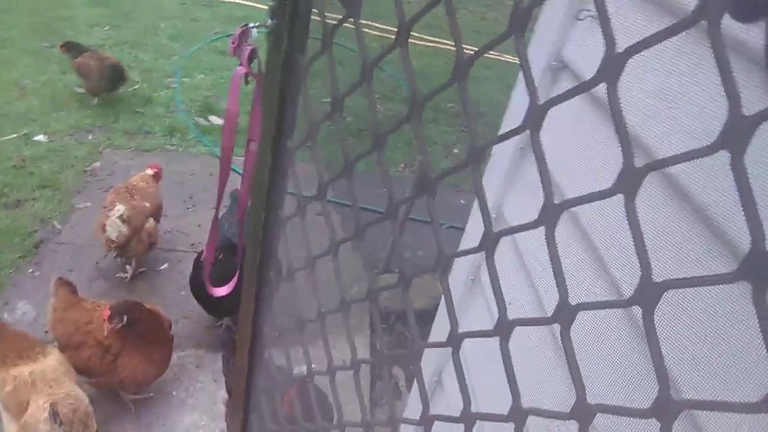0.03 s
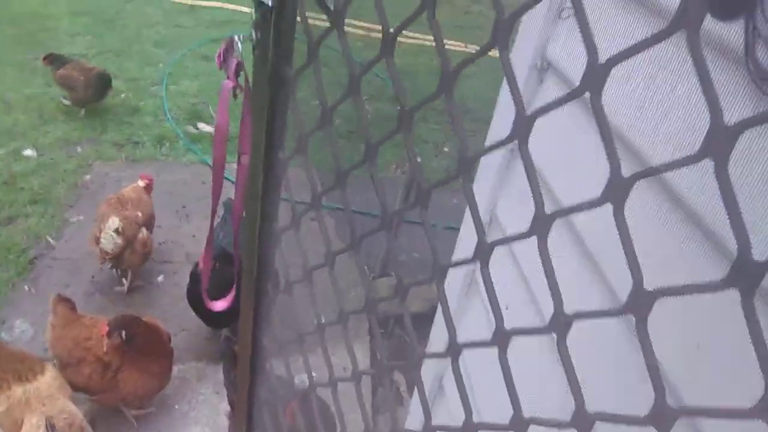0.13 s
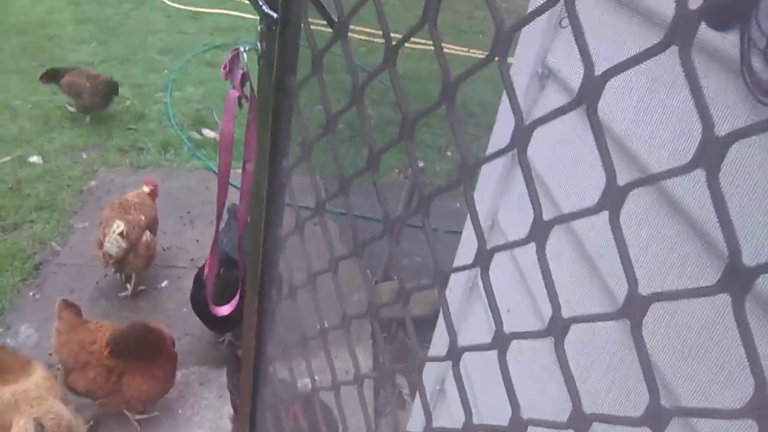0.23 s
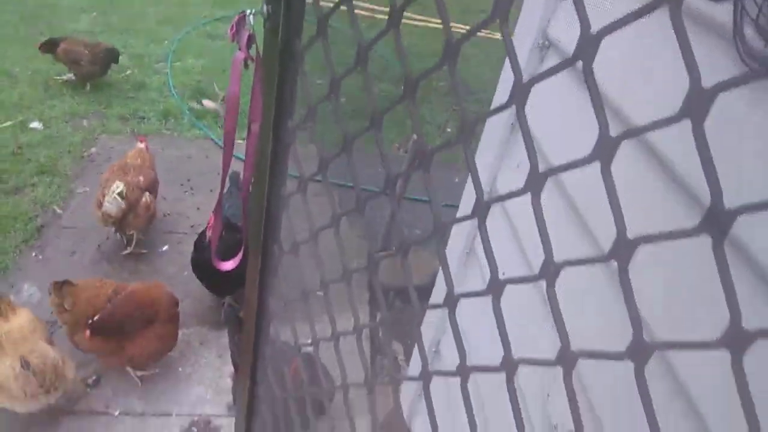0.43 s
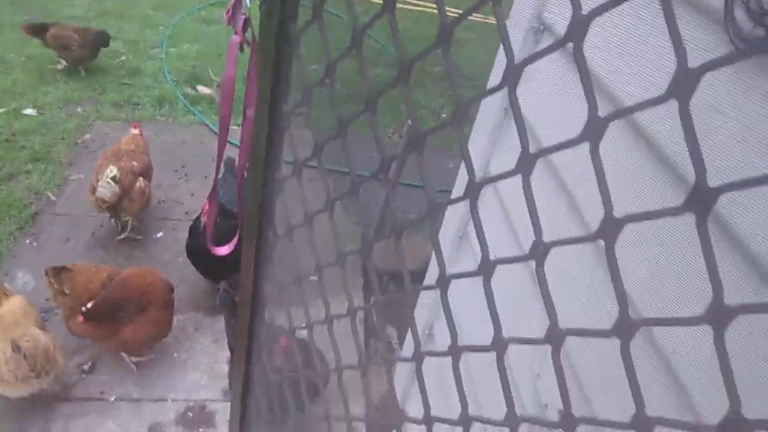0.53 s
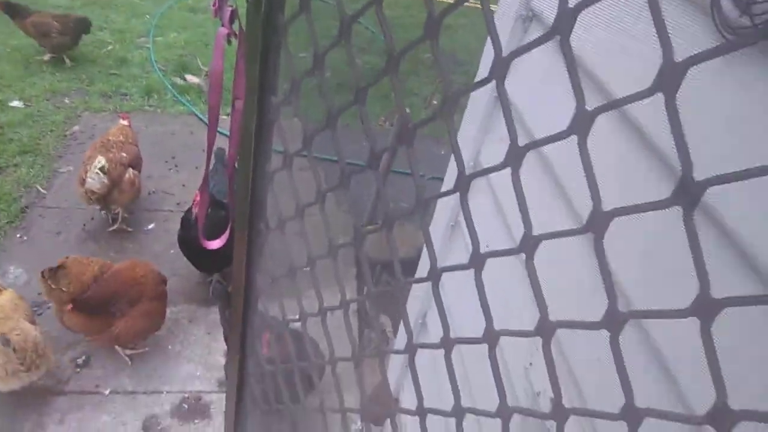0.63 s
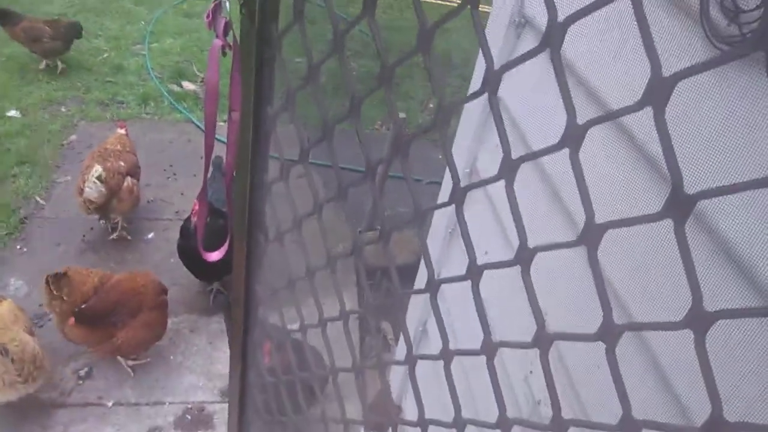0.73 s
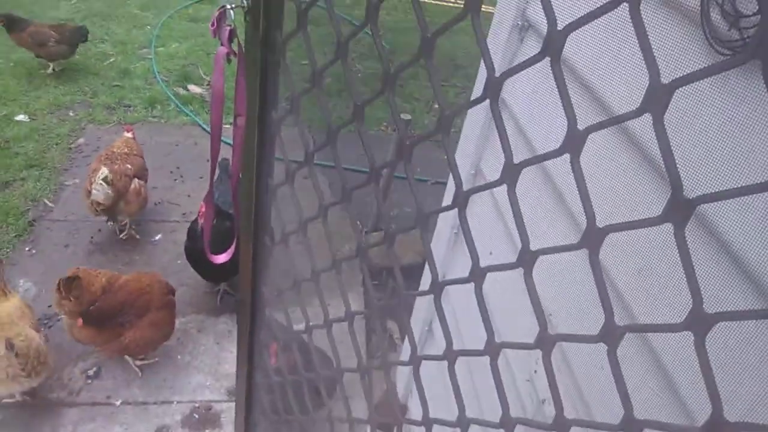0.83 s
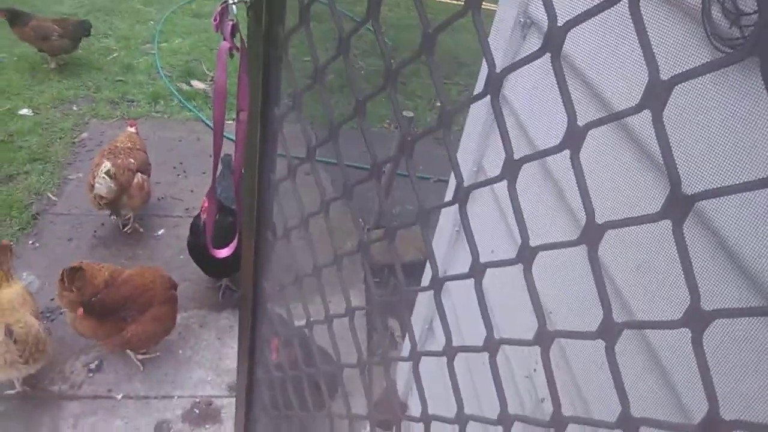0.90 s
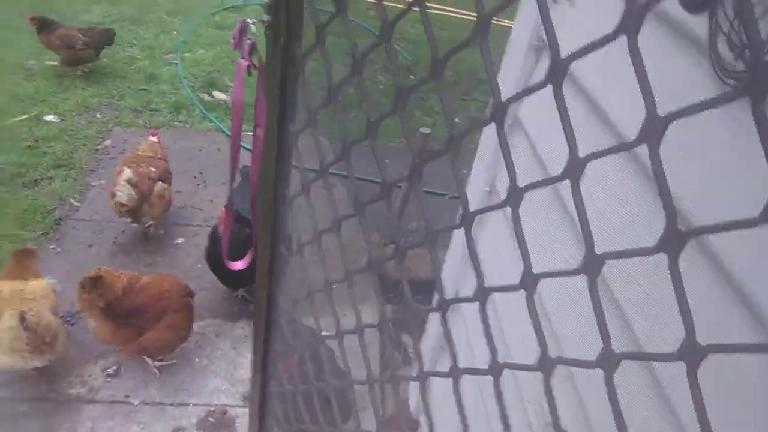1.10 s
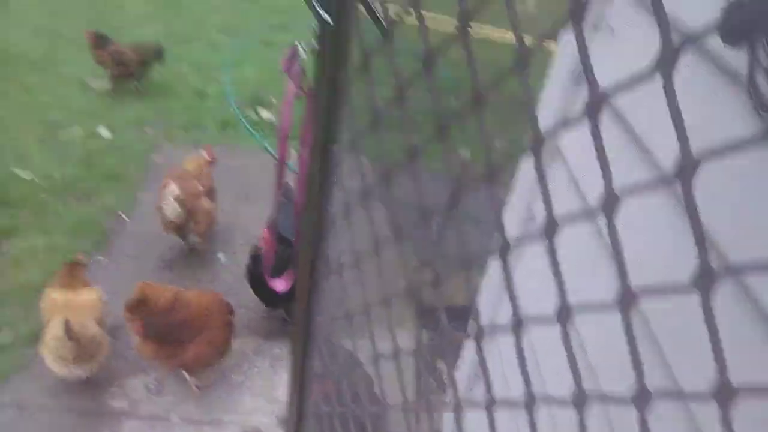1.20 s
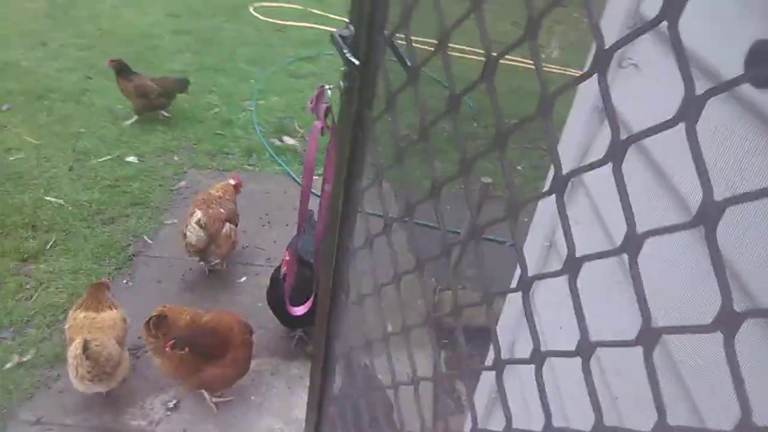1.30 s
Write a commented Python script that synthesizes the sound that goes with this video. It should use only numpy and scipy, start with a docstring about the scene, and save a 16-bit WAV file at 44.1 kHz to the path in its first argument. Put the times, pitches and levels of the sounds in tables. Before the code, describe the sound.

Outdoors by a house, hens cluck and warble gently with dull short echoes. Close to the microphone a latch clinks and a light mesh door bumps and rattles, hardest before the middle, then the sound thins to faint air.

```python
"""Hens clucking by a screen door

Hens cluck softly a few metres away in a yard. Short falling clucks and longer wavering calls are
stacks of pure tones coloured by the throat, with echoes from the house and fence. Blows make the door
frame and metal latch ring and the mesh buzz; the mesh also cracks in short bursts of noise.
Cloth rustles once at the start, and quiet outdoor air, a softly swaying noise, lies under it all."""
import sys
import numpy as np
from scipy import signal
from scipy.fft import rfft, irfft
from scipy.io import wavfile
from scipy.ndimage import uniform_filter1d

SR = 44100
rng = np.random.default_rng(int(sys.argv[2]) if len(sys.argv) > 2 else 0)


def boost_factor(decibels):
    """Convert a level in decibels to a linear amplitude factor."""
    exponent = np.asarray(decibels, float) / 20
    return 10 ** exponent


def log_audio(samples):
    """Write samples as a 16-bit WAV file to the path given in sys.argv[1]."""
    # one column per channel
    frames = np.atleast_2d(samples).T
    # limit to full scale, then quantise
    limited = np.clip(frames, -1, 1)
    pcm = np.round(limited * 32767).astype(np.int16)
    wavfile.write(sys.argv[1], SR, pcm)


N = 59535  # length in samples, 1.35 s


def noise(colour):
    """Random noise of unit strength, tinted by rows of frequency in Hz and relative level in dB."""
    hz, db = np.array(colour, float).T
    log_f = np.log(np.arange(N // 2 + 1) * SR / N + 1)
    shape = boost_factor(np.interp(log_f, np.log(hz), db))
    y = irfft(rfft(rng.standard_normal(N)) * shape, N)
    return y / y.std()


def wobble(rate, n):
    """Smooth random drift with a spread near 1; a higher rate (per second) drifts faster."""
    k = int(SR / rate)
    smooth = uniform_filter1d(rng.standard_normal(n + 2 * k), k)
    smooth = uniform_filter1d(smooth, k)
    return np.sqrt(k) * smooth[k:n + k]


def add(out, start_s, x):
    """Mixes x into out from start_s, trimming whatever falls outside."""
    i = int(round(start_s * SR))
    x = x[max(-i, 0):N - i]
    out[max(i, 0):max(i, 0) + len(x)] += x


def outdoor_air():
    """Quiet outdoor air: mostly low noise whose level sways gently."""
    # The tint of the air. Each row: frequency in Hz, relative level in dB per Hz.
    air_colour = [(15, -46.5), (25, -18.5), (60, -12.5), (140, -7), (293, -9.5), (666, -12), (1130, -9.5),
                  (1640, -16.5), (2250, -19), (3700, -24.5), (4300, -31), (8000, -34), (14000, -36.5)]
    level_db, sway_db, sway_per_s = -71.5, 0.7, 5
    return noise(air_colour) * boost_factor(level_db + sway_db * wobble(sway_per_s, N))


def cloth_rustle():
    """Rubbing cloth: tinted noise that swells and fades along a curve, with a fast flicker."""
    # How the rustle swells and fades. Each row: time in seconds, level in dB.
    rustle_curve = [(0.0, -80), (0.016, -69.5), (0.046, -73.5), (0.076, -59.5), (0.142, -72), (0.148, -67),
                    (0.172, -76), (0.2, -77.5)]
    # The tint of the rustle. Each row: frequency in Hz, relative level in dB per Hz.
    rustle_colour = [(880, -48), (1500, -28), (1730, -6), (2580, -13.5), (4270, -5), (5930, -3),
                     (14000, -17.5)]
    flicker_db = 1.5
    s, db = np.array(rustle_curve, float).T
    curve_db = np.interp(np.arange(N) / SR, s, db, right=-120)
    return noise(rustle_colour) * boost_factor(curve_db + flicker_db * wobble(260, N))


def mesh_cracks():
    """Cracks of the door mesh: narrow bands of noise that die away at once."""
    # Short noisy cracks. Each row: start in seconds, level in dB, centre in Hz, decay in seconds.
    crack_rows = [(.238, -48.5, 4500, 0.0016), (.238, -45.5, 2160, 0.0064), (.406, -52.5, 5000, 0.0023),
                  (0.413, -53, 5122, 0.0022), (.404, -42.5, 1000, 0.014), (.772, -76.5, 4500, 0.0015),
                  (.917, -45.5, 1980, .006), (.92, -39.5, 906, 0.0052)]
    out, t = np.zeros(N), np.arange(SR // 10) / SR
    for s, db, hz, decay_s in crack_rows:
        band = signal.butter(2, [hz / 1.14, hz * 1.1], "band", fs=SR, output="sos")
        y = signal.sosfilt(band, rng.standard_normal(len(t)))
        add(out, s, boost_factor(db) * y / y.std() * np.exp(-t / decay_s))
    return out


def struck(modes, blows, rattle_db):
    """Each blow is a smooth push, a shudder and a mesh buzz; longer contact makes a duller ring."""
    shudder_db, shudder_s = -3.5, 0.025  # loose joints keep pushing after each bump
    rattle_s, rattle_hz = 0.053, 3700  # mesh buzz after each blow: decay and middle pitch
    quick_bass_hz = 122  # a 1 ms blow barely moves modes under this; longer blows reach lower
    out, t = np.zeros(N), np.arange(SR // 3) / SR
    hz, mode_db, t60 = np.array(modes, float).T[:, :, None]
    rings = boost_factor(mode_db) * np.sin(2 * np.pi * hz * t) * boost_factor(-60 * t / t60)
    buzz = signal.butter(2, [rattle_hz / 2, rattle_hz * 2], "band", fs=SR, output="sos")
    for s, db, ms in blows:
        push_ms = np.arange(600) / SR * 1000
        push = np.exp(-(push_ms / (ms / 2) - 2) ** 2)
        bass_loss = 1 + (quick_bass_hz / max(ms, .6) / hz) ** 2
        clean = signal.fftconvolve((rings / bass_loss).sum(0), push)[:len(t)]
        shaking = rng.standard_normal(len(t)) * np.exp(-t / shudder_s)
        loose = signal.fftconvolve(clean, shaking)[:len(t)]
        loose = loose * np.sqrt(ms / (1000 * shudder_s) / push.sum())
        mesh = signal.sosfilt(buzz, rng.standard_normal(len(t))) * np.exp(-t / rattle_s)
        # the row's level is the peak of the clean ring
        ring = (clean + boost_factor(shudder_db) * loose) / np.abs(clean).max()
        add(out, s, boost_factor(db) * (boost_factor(rattle_db) * mesh - ring))
    return out


def latch():
    """Light taps make the metal latch ring in many clear tones; its deep bass is filtered off."""
    # The latch's ringing tones. Each row: pitch in Hz, relative level in dB, seconds to fall by 60 dB.
    latch_modes = [(216, -11.5, 0.15), (418, -1, 0.081), (534, -7.5, 0.058), (838, -21, 0.11),
                   (980, 0.5, .15), (1240, -9, 0.09), (1677, -2, 0.11), (1930, -28, 0.044),
                   (2233, -14.5, 0.079), (2580, -18.5, 0.026), (3350, -3.5, 0.0067), (4000, -10, 0.018),
                   (5000, -8, 0.0068), (5600, -16.5, 0.0088), (7440, -57.5, 0.0098)]
    # Taps on the latch. Each row: start in seconds, level in dB, contact in milliseconds.
    latch_taps = [(.2375, -27.5, 0.12), (.243, -50, 0.13), (0.3, -42, 0.067), (.917, -42, 0.23)]
    no_bass = signal.butter(3, 170, "high", fs=SR, output="sos")
    return signal.sosfilt(no_bass, struck(latch_modes, latch_taps, rattle_db=-31))


def door_frame():
    """Dull bumps make the light frame ring low and briefly; a thin door radiates no deep bass."""
    # The frame's ringing tones. Each row: pitch in Hz, relative level in dB, seconds to fall by 60 dB.
    frame_modes = [(96, -18.5, 0.05), (162, -8.5, 0.027), (207.7, -10.5, 0.047), (264, 1, 0.026),
                   (328.3, 9, 0.02), (419.5, 3, 0.059), (575, -17, .05), (717, -26, 0.14),
                   (816, -14.5, 0.014), (1229, -22.5, .05), (1760, -16, .05)]
    # Bumps on the frame. Each row: start in seconds, level in dB, contact in milliseconds.
    frame_knocks = [(0.303, -39.5, 0.55), (0.312, -42.5, 0.87), (0.326, -23.5, 1), (.341, -27, 1.9),
                    (.357, -31, 3), (0.387, -42.5, 3.3), (0.398, -23.5, 2.15), (0.4032, -11.5, 1.154),
                    (0.413, -17.5, 0.48), (0.424, -23, 0.92), (.435, -27.5, 0.57), (0.447, -44, 0.3),
                    (.475, -34, 0.58), (.49, -37, 0.78), (0.518, -30.5, 1.4), (.524, -33, 1.8),
                    (.555, -44.5, 2.4), (0.628, -50, 5.4), (.769, -35.5, 2.35), (.777, -53.5, 1.3),
                    (0.788, -35.5, 1.18), (.792, -33.5, 2.34), (0.798, -40.5, 1.27), (0.92, -29, 1),
                    (.94, -46.5, 5.6), (1.068, -53, 7), (1.097, -41.5, 9), (1.181, -53.5, 4.9)]
    no_bass = signal.butter(4, 108, "high", fs=SR, output="sos")
    return signal.sosfilt(no_bass, struck(frame_modes, frame_knocks, rattle_db=-52.5))


def yard(x):
    """The yard around a sound: dull slap echoes from house and fence, and a soft scattered tail."""
    # House and fence echoes. Each row: delay in seconds, level in dB.
    echo_rows = [(.013, -7), (.045, -12.5), (.085, -26.5)]
    tail_db, tail_hz, tail_t60_s = -30, 1000, 0.35
    echo_hz = 655  # echoes are dull above this
    t = np.arange(SR // 2) / SR
    tail = rng.standard_normal(len(t)) * boost_factor(-60 * t / tail_t60_s) * np.minimum(t / 0.028, 1)
    tail = signal.sosfilt(signal.butter(1, tail_hz, fs=SR, output="sos"), tail)
    response = boost_factor(tail_db) * tail / np.sqrt(np.sum(tail ** 2))
    dull = signal.butter(3, echo_hz, fs=SR, output="sos")
    slap = signal.sosfilt(dull, signal.unit_impulse(300))
    for s, db in echo_rows:
        add(response, s, boost_factor(db) * slap)
    return x + signal.fftconvolve(x, response)[:N]


def voice(hz, gain, boost_db, half_db):
    """Tones of the hen's voice box (syrinx), and of half its pitch, through the throat, with breath."""
    # The voice's basic tint. Each row: frequency in Hz, relative level in dB.
    voice_colour = [(300, -15), (700, 1), (950, -7), (1400, 1), (1900, -4.5), (2200, -10), (2600, -32.5),
                    (3600, -55), (3900, -12), (4100, -47), (4400, -19), (4800, -34), (8000, -55.5)]
    throat_hz, throat_width_hz = 1250, 335
    boost_tilt = 0.112  # a ringing throat dulls what lies above it
    beak_db = -15.5  # treble loss while the beak is nearly shut
    hiss_db, hiss_hz = -34, 4500  # air through the beak; a stronger throat boost raises it
    jitter, shimmer_db = 0.013, 0.8  # random drift of pitch (share) and of level
    breath_db = -17  # roughness; a throat boost or cut reduces it
    n = len(hz)
    hz = hz * (1 + jitter * wobble(220, n))
    k = np.arange(1, 25)[:, None] / 2  # whole multiples of the pitch and those halfway between
    f = k * hz
    at, db = np.array(voice_colour, float).T
    lines_db = np.interp(np.log(f), np.log(at), db)
    lines_db = lines_db + boost_db * np.exp(-((f - throat_hz) / throat_width_hz) ** 2)
    lines_db = lines_db - boost_tilt * boost_db * (f > 1.3 * throat_hz)
    lines_db = lines_db + beak_db * (f > 3000) * (boost_db < 4)
    lines_db = lines_db + half_db * (2 * k % 2)  # only the halfway lines
    phase = 2 * np.pi * np.cumsum(hz) / SR
    lines = boost_factor(lines_db) * np.sin(k * (phase + 1.4 * k))
    tone = np.sqrt(2) * lines.sum(0) * boost_factor(shimmer_db * wobble(170, n))
    beak = signal.butter(2, [hiss_hz / 2, hiss_hz * 2], "band", fs=SR, output="sos")
    hiss = boost_factor(hiss_db + boost_db / 2) * signal.sosfilt(beak, rng.standard_normal(n))
    roughness = 1 + boost_factor(breath_db - np.abs(boost_db)) * wobble(1200, n)
    return gain * (tone * roughness + hiss)


def short_clucks():
    """Each cluck starts high, swoops down to its pitch, swells and is cut short."""
    # Each row: start in seconds, length in seconds, pitch in Hz after the swoop, level in dB,
    # throat boost in dB.
    cluck_rows = [(-.02, 0.043, 686, -64.5, -6), (.028, .03, 670.4, -72, -3), (.142, 0.024, 679, -62, 22),
                  (0.177, 0.017, 578, -70.5, 13), (0.515, .026, 596.4, -69, 17),
                  (0.574, 0.015, 604, -71, 21), (0.841, .025, 638.5, -52.5, 22.5),
                  (.891, 0.025, 663.5, -54, 21.5), (0.935, .030, 685.8, -50, 20),
                  (0.961, 0.044, 549, -67.5, 10), (1.007, 0.03, 611, -82, 22),
                  (1.043, 0.0315, 630, -93.5, 20.5), (1.081, 0.013, 656, -86, 11),
                  (1.123, 0.027, 630, -88.5, 18.5), (1.168, 0.049, 588.5, -91, 22.5),
                  (1.24, 0.036, 547, -91.5, 24.5)]
    swoop, swoop_s = 0.4, 0.003  # starts this share too high; time of the drop
    attack, release_s = 0.7, 0.003  # share of the length spent swelling; time of the cut
    out = np.zeros(N)
    for s, length, hz, db, boost_db in cluck_rows:
        t = np.arange(int((length + 6 * release_s) * SR)) / SR
        swell = np.sin(np.pi / 2 * np.clip(t / (attack * length), 0, 1))
        cut = np.exp(-(np.maximum(t - 0.9 * length, 0) / release_s) ** 2)
        falling_hz = hz * (1 + swoop * np.exp(-t / swoop_s))
        add(out, s, voice(falling_hz, boost_factor(db) * swell * cut, boost_db, -58))
    return out


def long_calls():
    """Each long call glides along its own curves of pitch, level and colour."""
    # One list of rows per call. Each row: time in seconds, pitch in Hz, level in dB,
    # throat boost in dB, level of the half-pitch lines in dB.
    call_curves = [
        [(.192, 1024, -79, -22, -45), (.198, 955, -58.5, -7.5, -23), (.205, 822.5, -56, 19, -26.5),
         (.212, 707, -58, 9, -40), (.218, 718.6, -74, 5.5, -20), (.224, 714.6, -51.5, -0.5, -24),
         (.235, 679, -60, -25, 12), (.25, 809.6, -43, -4, 1), (.265, 713, -69, 25.5, -7.5),
         (.28, 706.7, -47.5, 1.5, -31.5), (.298, 718, -57, 8.5, 12), (.306, 705, -112.5, -13, -19.5)],
        [(.482, 980, -75, -4, -32), (.488, 888, -59, 8, -26), (.495, 704, -55, 0.5, -34.5),
         (.508, 658, -57.5, -3.5, -33), (.522, 703, -65, 5.5, -34), (.53, 660, -84, 20, -31)],
        [(.532, 988, -84.5, -5, -26), (.537, 980, -52.5, 13, -17.5), (.544, 852, -53, -11, -15),
         (.552, 739.6, -51.5, -3, -8), (.57, 773.6, -51.5, -12, -13.5), (.58, 858, -48, -3, -18),
         (.588, 978, -48, -10.5, -26), (.594, 943, -48.5, -7, -24), (.6, 773.6, -46.5, -6, -18.5),
         (.615, 739.4, -51.5, -5, -16.5), (.63, 704, -55, 9, -1), (.646, 708.4, -51.5, 5, 2),
         (.654, 710, -68.5, -3, 6.5)],
    ]
    out = np.zeros(N)
    for rows in call_curves:
        s, *columns = np.array(rows, float).T
        t = np.arange(s[0], s[-1], 1 / SR)
        curves = [uniform_filter1d(np.interp(t, s, c), size=88) for c in columns]  # 2 ms rounding
        hz, db, boost_db, half_db = curves
        add(out, s[0], voice(hz, boost_factor(db), boost_db, half_db))
    return out


def scene():
    """Mixes all layers; only the hens get the yard's echoes."""
    hens = yard(short_clucks() + long_calls())
    door = door_frame() + latch() + mesh_cracks()
    return (hens + door + cloth_rustle() + outdoor_air())[None]


def roll_off(x):
    """The treble ends steeply here."""
    return signal.sosfilt(signal.butter(12, 14350, fs=SR, output="sos"), x)


def record(dry):
    """Turns the finished mix into the final sound."""
    return roll_off(dry)


dry = scene()
out = record(dry)
log_audio(out)
```